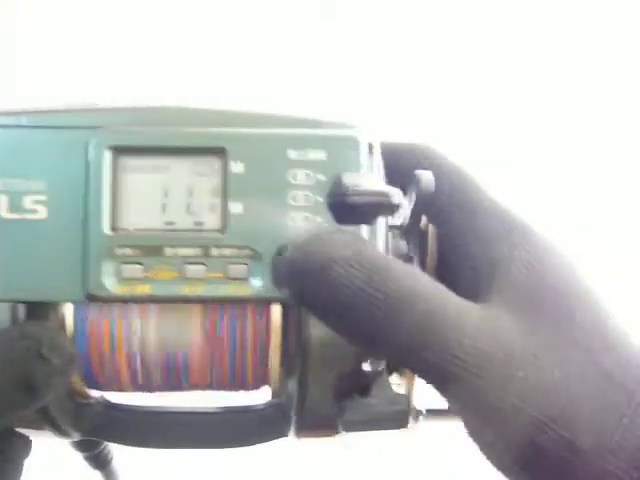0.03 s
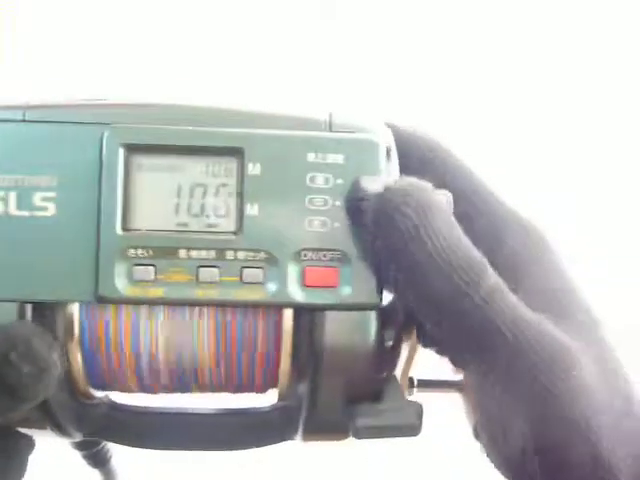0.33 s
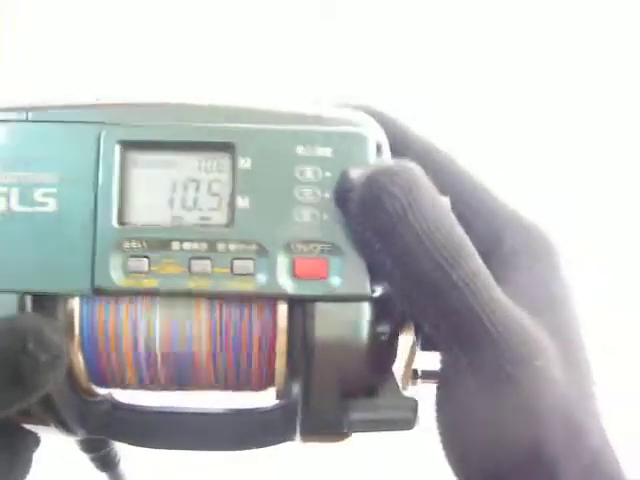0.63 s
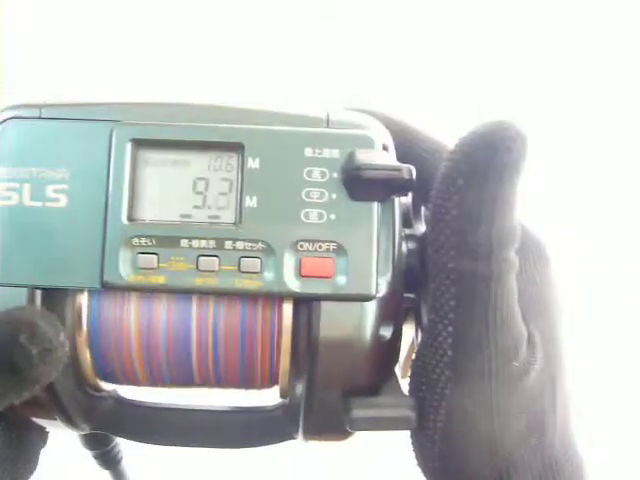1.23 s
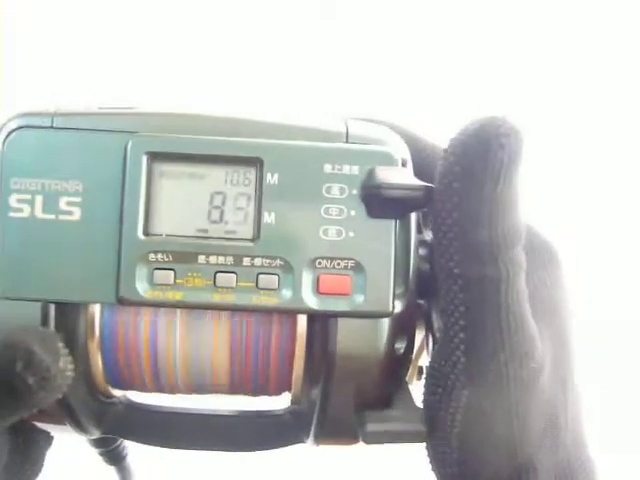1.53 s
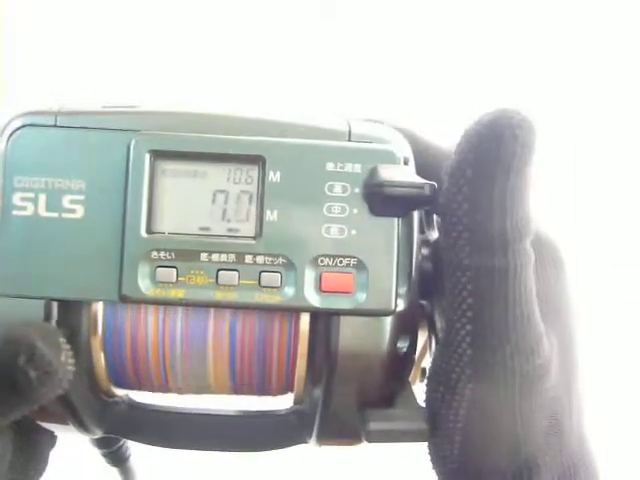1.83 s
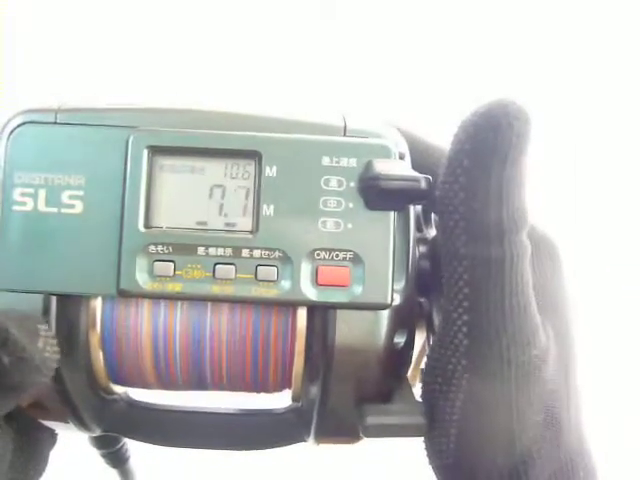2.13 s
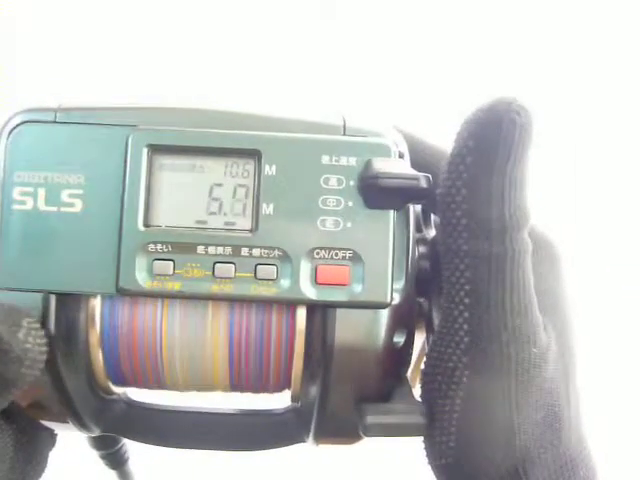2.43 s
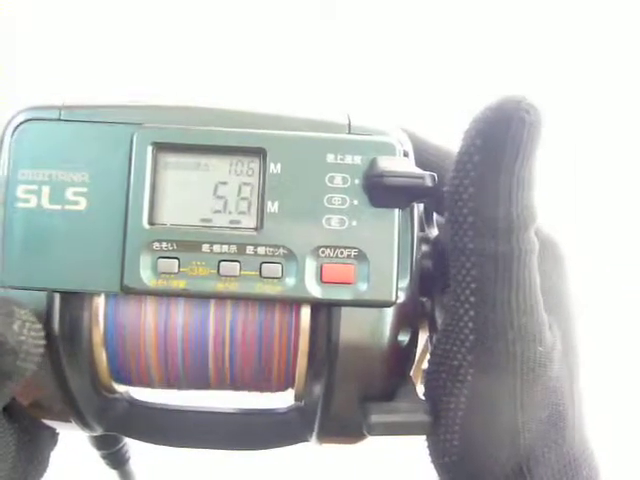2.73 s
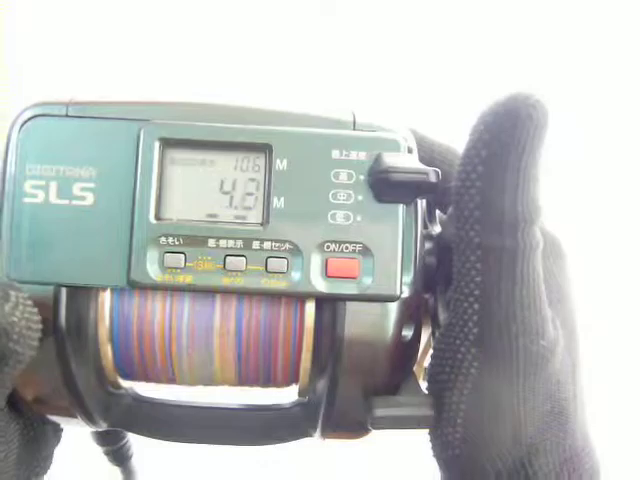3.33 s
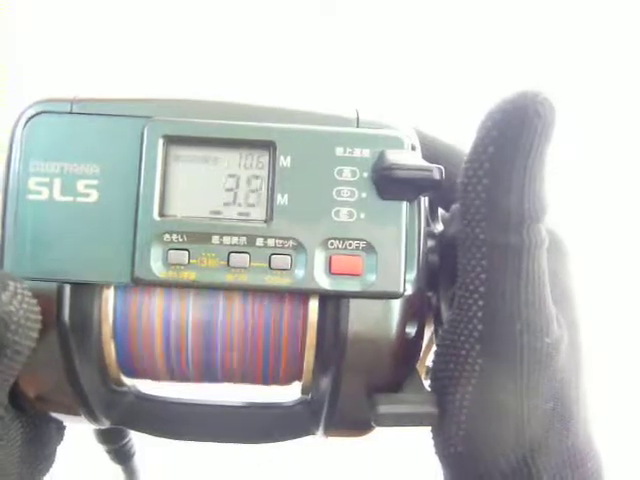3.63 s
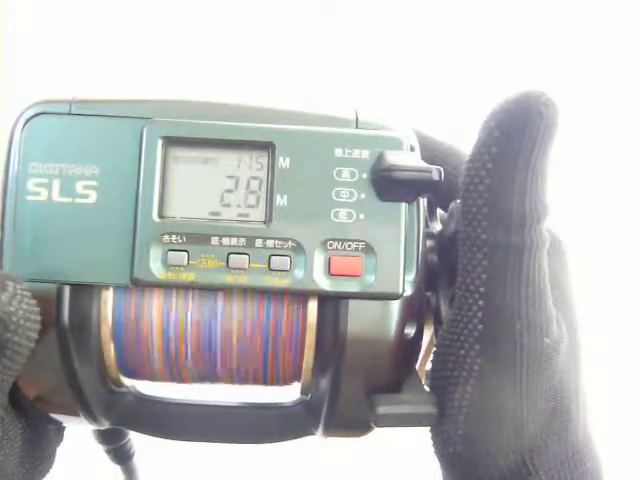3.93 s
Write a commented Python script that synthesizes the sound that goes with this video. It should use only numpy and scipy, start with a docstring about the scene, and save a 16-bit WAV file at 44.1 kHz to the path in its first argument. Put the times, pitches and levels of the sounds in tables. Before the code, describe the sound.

Electric fishing reel whines, clicks, then speeds up into a steady rattling whir.

```python
"""A thin gear whine over soft rubbing: an electric fishing reel slowly winds in line, close to the
microphone. The speed lever clicks over, the motor spins up to a steady hum, and the gear teeth
start to bounce, rattling densely in the casing. Near the end it slows and the whine comes back."""
import sys
import numpy as np
from scipy import signal
from scipy.fft import rfft, irfft, next_fast_len
from scipy.io import wavfile
from scipy.ndimage import map_coordinates

SR = 44100
rng = np.random.default_rng(int(sys.argv[2]) if len(sys.argv) > 2 else 0)


def log_audio(samples):
    """Write samples as a 16-bit WAV file to the path given in sys.argv[1]."""
    # one column per channel
    frames = np.atleast_2d(samples).T
    # limit to full scale, then quantise
    limited = np.clip(frames, -1, 1)
    pcm = np.round(limited * 32767).astype(np.int16)
    wavfile.write(sys.argv[1], SR, pcm)


N = 176400
TIME_S = np.arange(N) / SR


def amp(db):
    """Decibels to gain."""
    return 10 ** (np.asarray(db) / 20)


def unit_rms(x):
    """Scale to rms 1."""
    return x / np.sqrt(np.mean(x ** 2) + 1e-20)


def over_time(points):
    """Straight lines through (time_s, value) points."""
    return np.interp(TIME_S, *np.transpose(points))


def response_db(points, hz):
    """Read (frequency_hz, gain_db) points on a log frequency axis."""
    points_hz, gain_db = np.transpose(points)
    return np.interp(np.log(hz + 1), np.log(points_hz + 1), gain_db)


def wobble(rate_hz):
    """A smooth random curve, rate_hz knots a second."""
    knots = rng.standard_normal(int(N * rate_hz / SR) + 4)
    return map_coordinates(knots, [TIME_S * rate_hz])


def through_body(x, response):
    """Ring x through a body with the given (frequency_hz, gain_db) response."""
    size = 2 * next_fast_len(N // 2 + 8192)
    gain = amp(response_db(response, np.fft.rfftfreq(size, 1 / SR)))
    cepstrum = irfft(np.log(gain), size)
    cepstrum[1:size // 2] *= 2  # minimum phase: the ring follows the knock
    cepstrum[size // 2 + 1:] = 0
    return irfft(rfft(x, size) * np.exp(rfft(cepstrum)), size)[:N]


def low_pass(x, cutoff_hz):
    """A steep low-pass."""
    size = next_fast_len(N + SR // 2)
    gain = 1 / np.sqrt(1 + (np.fft.rfftfreq(size, 1 / SR) / cutoff_hz) ** 80)
    return irfft(rfft(x, size) * gain, size)[:, :N]


def tone(phase, flutter_db, rate_hz):
    """A sine of rms about 1 whose level flutters."""
    return np.sqrt(2) * np.sin(phase + rng.uniform(0, 2 * np.pi)) * amp(flutter_db * wobble(rate_hz))


def spool_load(rise_db_per_s=0.53):
    """Gain that rises slowly as the spool fills."""
    return amp(rise_db_per_s * (TIME_S - N / 2 / SR))


# Thin tones of the drive, faint even this close: pitch_hz, level_db
DRIVE_PITCHES = [(3898, -54.5), (4102, -58.5)]


def drive(smooth_running, dip_db=-6.5):
    """The drive's fluttering tones hold their pitch at any speed and weaken when it runs fast."""
    tones = sum(amp(db) * tone(2 * np.pi * hz * TIME_S + .25 * wobble(60), flutter_db=2.5, rate_hz=90)
                for hz, db in DRIVE_PITCHES)
    return tones * amp(dip_db * (1 - smooth_running))


# Colour of the friction, behind the whine: frequency_hz, gain_db
RUB_SPECTRUM = [(40, -35), (150, -27.5), (480, -20.5), (640, -21), (1050, -14), (1380, -22), (1720, -12.5),
                (2000, -15), (2330, -11), (2650, -18.5), (3200, -20), (3680, -24.5), (3950, -15.5),
                (4150, -23), (4350, -37.5)]
# Swell of the friction: time_s, gain_db
RUB_SWELL = [(0, -38), (.22, -36), (.45, -37.5), (.6, -37.5), (.76, -37.5), (.85, -30.5), (3.85, -29.5),
             (4, -33)]


def rub():
    """Gears and line slide with a soft, grainy friction."""
    grain = rng.standard_normal(N) * amp(2.5 * wobble(400))
    return amp(over_time(RUB_SWELL)) * unit_rms(through_body(grain, RUB_SPECTRUM))


# Tones of the meshing gears: multiple_of_speed, level_db, start_s, end_s
MESH_TONES = [(4, -12.5, .05, 0.65), (5, 2, 0.082, 4.2), (9, 1.5, .79, 3.95), (10, -2, .1, 4.2),
              (15, 1, -.02, .765)]
# The whine's path through the casing to the microphone: frequency_hz, gain_db
WHINE_RESPONSE = [(600, -11), (700, -6), (740, -10), (790, -5.5), (1170, -6), (1300, -20.5), (1600, -13),
                  (2050, -9.5), (2220, -6.5), (2380, 1), (2650, 0.5), (2950, -0.5), (3300, -14.5),
                  (3800, -35)]
# Swell of the whine: time_s, gain_db
WHINE_SWELL = [(0, -36), (.12, -31.5), (.24, -34.5), (.55, -32.5), (.76, -32), (.82, -29.5), (.85, -27),
               (.93, -32), (3.82, -36), (3.9, -25.5), (3.96, -31), (4, -30)]


def gear_whine(speed_hz, angle, fade_s=.012):
    """Smoothly meshing teeth make tones that glide through the casing's resonances."""
    tones = np.zeros(N)
    for multiple, db, start_s, end_s in MESH_TONES:
        gain = amp(db + response_db(WHINE_RESPONSE, multiple * speed_hz))
        gate = (np.tanh((TIME_S - start_s) / fade_s) - np.tanh((TIME_S - end_s) / fade_s)) / 2
        tones += gain * gate * tone(multiple * angle, flutter_db=1.5, rate_hz=70)
    return amp(over_time(WHINE_SWELL)) * tones


# A soft click, then a sharp one, right by the microphone: start_s, gain_db, pitch_ratio
LEVER_CLICKS = [(0.674, -17.5, 0.58), (0.7631, 0, 0.971)]
# Modes of the lever, scaled by each click: delay_s, pitch_hz, level_db, rise_s, t60_s
LEVER_MODES = [(0, 1874, 6.5, 0.0021, 0.0084), (.0019, 3020, 2.5, 0.00022, 0.0061),
               (.002, 1050, -12, .0002, .004)]


def lever():
    """The speed lever snaps over its detent with two short rings."""
    clicks = np.zeros(N)
    for start_s, gain_db, pitch_ratio in LEVER_CLICKS:
        for delay_s, pitch_hz, level_db, rise_s, t60_s in LEVER_MODES:
            age_s = np.maximum(TIME_S - start_s - delay_s, 0)
            envelope = amp(gain_db + level_db - 60 * age_s / t60_s) * (1 - np.exp(-age_s / rise_s))
            clicks += envelope * np.sin(2 * np.pi * pitch_hz * pitch_ratio * age_s)
    return clicks


# Partials of the motor's hum, heard close up: multiple_of_speed, relative_level_db
HUM_PARTIALS = [(.855, -28), (1.47, -30.5), (1.53, -34), (2, -19), (3, -13.5), (4, -20.5), (5, -10),
                (5.44, -17), (6, -16), (8, -16.5), (9, -15), (10, -19), (11, -20.5), (12, -29.5)]


def motor_hum(pace, angle):
    """The rotor shakes the reel once a turn; the hum and its partials grow steeply with speed."""
    fundamental = amp(-28) * pace ** 5.97 * tone(angle, flutter_db=0.11, rate_hz=20)
    partials = sum(amp(db) * tone(multiple * angle, flutter_db=2, rate_hz=35)
                   for multiple, db in HUM_PARTIALS)
    return fundamental + amp(-27) * pace ** 12 * spool_load() * partials


# The casing, struck from inside and heard close up: frequency_hz, gain_db
CASING_RESPONSE = [(60, -32.5), (230, -23), (340, -3.5), (440, -16), (570, -18.5), (680, -7), (800, -6.5),
                   (870, -10.5), (1020, -6), (1300, -7), (1420, -11.5), (1560, -3), (1770, -0.5),
                   (1840, -4), (1950, -3), (2330, 1), (2620, -8.5), (2850, -6.5), (3180, -10), (3480, -7),
                   (3700, -15.5), (4100, -25), (4350, -35.5)]


def tooth_rattle(pace, angle, contacts_per_turn=5, scatter_gaps=.3, spread_db=3.5):
    """Bouncing teeth knock at uneven moments and strengths and ring the casing."""
    contacts = angle / (2 * np.pi) * contacts_per_turn
    count = int(contacts[-1])
    timing, strength, direction = rng.standard_normal((count, 3)).T
    knock_samples = np.interp(np.arange(count) + scatter_gaps * timing, contacts, np.arange(N))
    knocks = np.bincount(knock_samples.astype(int), amp(spread_db * strength) * np.sign(direction), N)
    ringing = unit_rms(through_body(knocks, CASING_RESPONSE))
    return amp(-27.5) * pace ** 5.3 * spool_load() * ringing


# Turning rate of the motor: time_s, speed_hz
MOTOR_SPEED = [(0, 144), (.098, 153), (.23, 158.6), (.36, 156.4), (.58, 148.4), (.762, 148.6), (.79, 228),
               (.82, 270), (0.861, 296), (0.909, 312), (1.05, 318), (1.702, 325.2), (2.402, 323.3),
               (3.769, 323.9), (3.812, 315.5), (3.848, 290), (3.91, 260), (4, 221)]
FULL_SPEED_HZ, BOUNCE_ONSET_HZ, BOUNCE_WIDTH_HZ = 324, 263, 16
TURNS_PER_SPOOL_TURN, SHAKE_LAG_S = 24, 0.016


def scene():
    """The reel at close range: as the motor speeds up, whine and rubbing give way to hum and rattle."""
    speed_hz = over_time(MOTOR_SPEED)
    angle = 2 * np.pi * np.cumsum(speed_hz) / SR
    angle += 0.064 * np.sin(angle / TURNS_PER_SPOOL_TURN)  # one swing per spool turn
    angle += .05 * wobble(20)
    pole = np.exp(-1 / (SHAKE_LAG_S * SR))  # the shaking takes a moment to follow the speed
    lagged_hz = speed_hz[0] + signal.lfilter([1 - pole], [1, -pole], speed_hz - speed_hz[0])
    pace = lagged_hz / FULL_SPEED_HZ
    smooth_running = 1 / (1 + np.exp((speed_hz - BOUNCE_ONSET_HZ) / BOUNCE_WIDTH_HZ))
    shaking = motor_hum(pace, angle) + tooth_rattle(pace, angle)
    meshing = smooth_running * (gear_whine(speed_hz, angle) + rub())
    return (shaking + meshing + drive(smooth_running) + lever())[None]


def record(dry, offset=-.059, clip_level=.72):
    """One close, narrow-band microphone feeds an off-centre input that clips on the loudest click."""
    microphone = low_pass(dry, cutoff_hz=4360)
    clipped = np.clip(microphone + offset, -clip_level, clip_level)
    return low_pass(clipped, cutoff_hz=16500)


dry = scene()
out = record(dry)
log_audio(out)
```